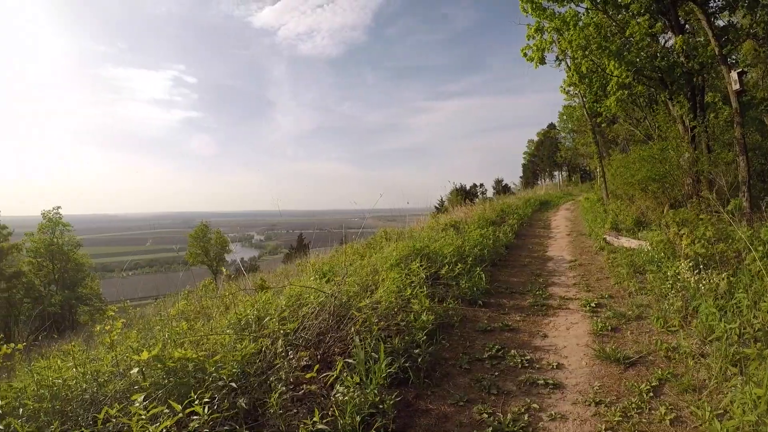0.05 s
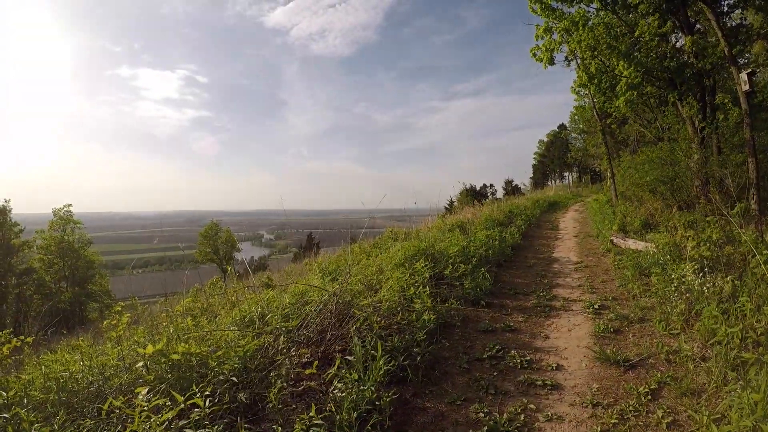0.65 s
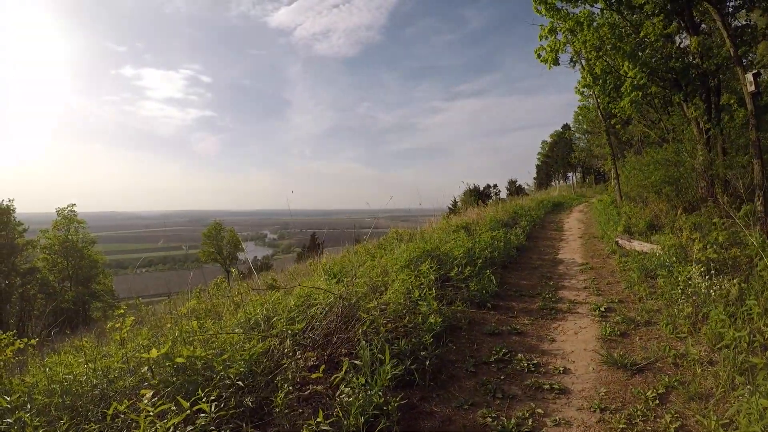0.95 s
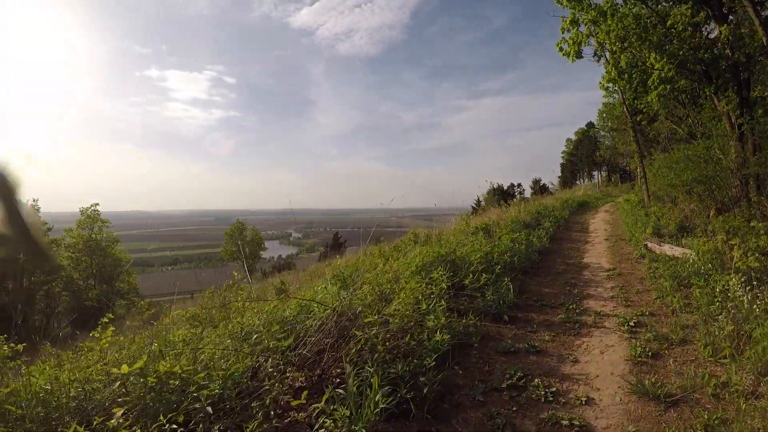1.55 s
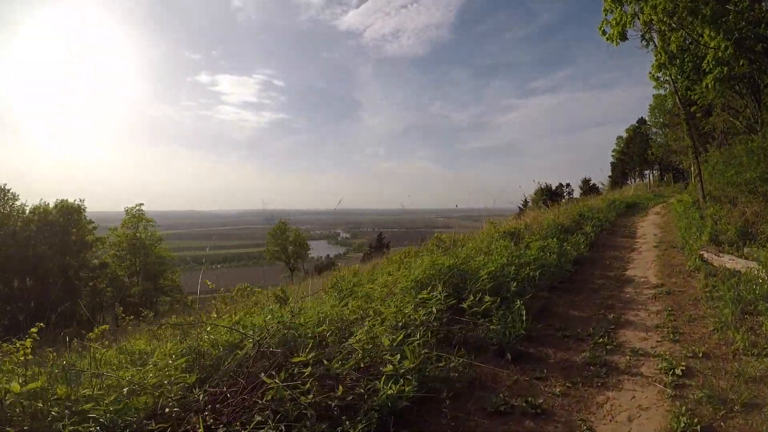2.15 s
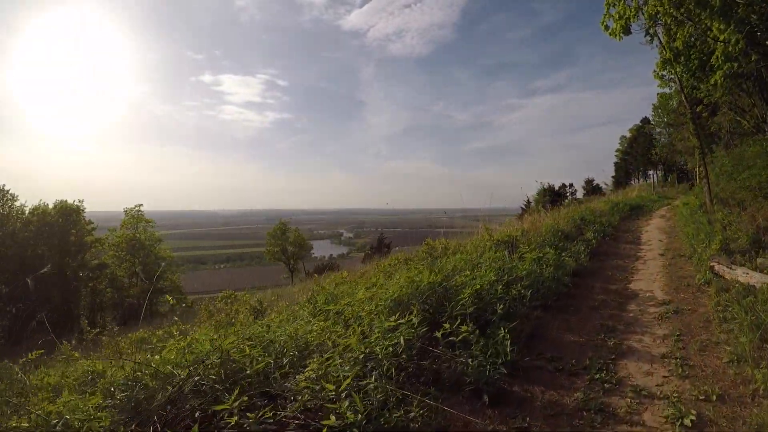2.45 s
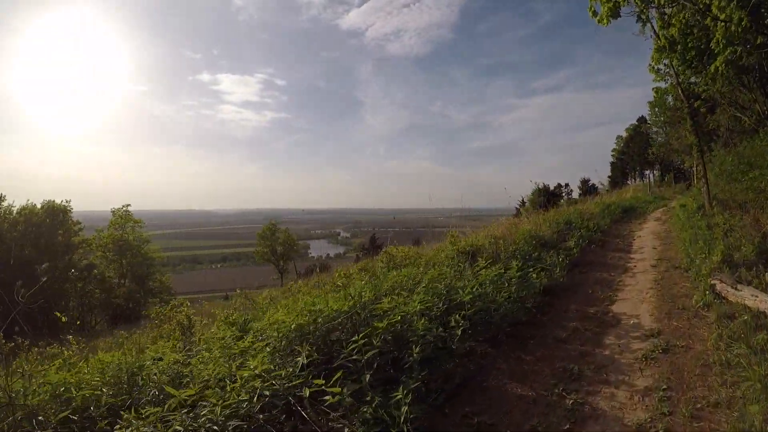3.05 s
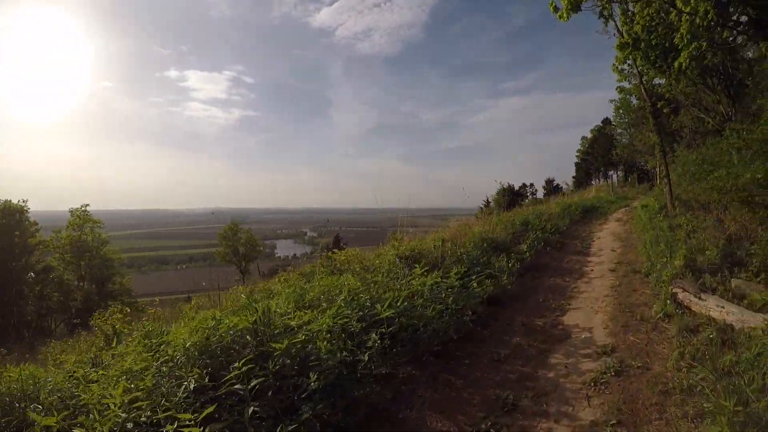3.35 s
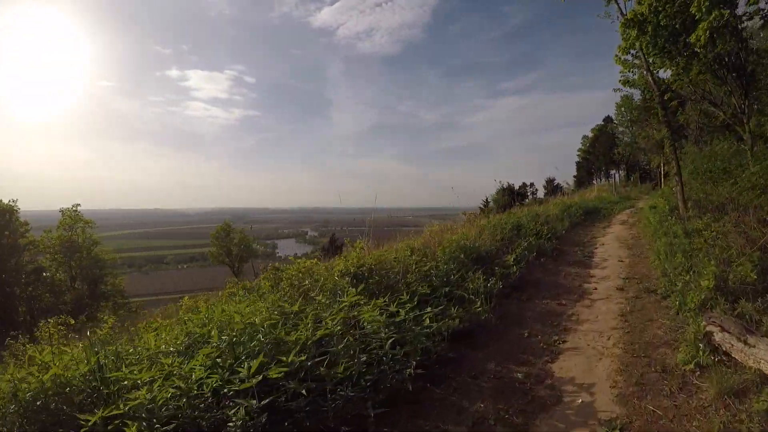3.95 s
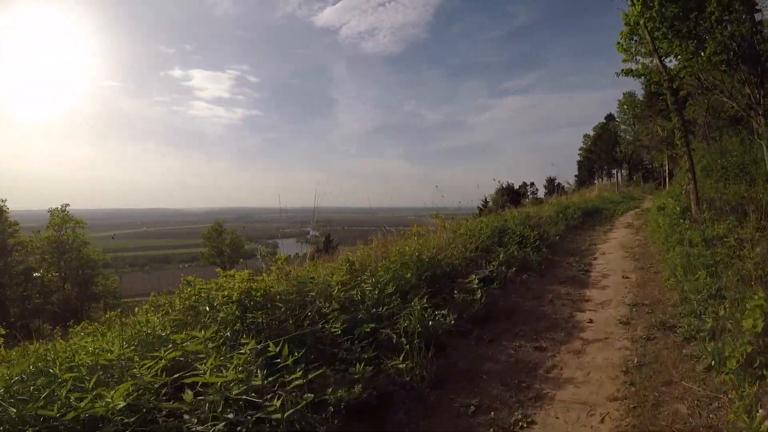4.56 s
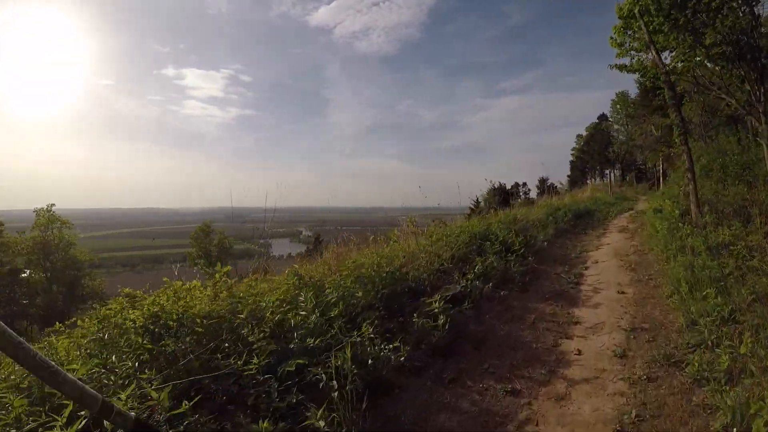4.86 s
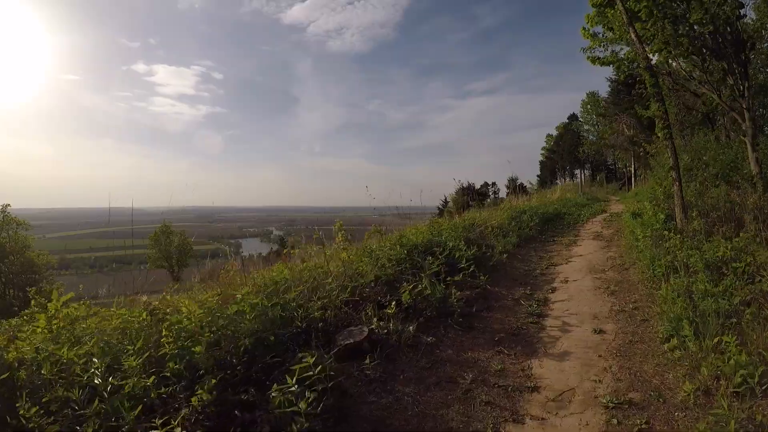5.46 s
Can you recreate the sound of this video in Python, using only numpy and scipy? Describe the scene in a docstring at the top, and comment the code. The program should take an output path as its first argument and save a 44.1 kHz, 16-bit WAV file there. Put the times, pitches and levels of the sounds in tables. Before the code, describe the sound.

Close, hollow handling knocks and plastic clacks over faint microphone wind give way to quiet steps on a dirt trail and rustling.

```python
"""Fingers knock and rub on a small hand-held camera as a walker on a dirt trail shifts the grip.
Impacts and stick-slip friction excite the damped modes of its housing and mount; a plastic joint clacks.
Then soft steps thud on packed earth, and clothing and tall grass swish close by through friction.
Light wind rumbles on the microphone ports as turbulent pressure, over a very quiet open landscape.
A limiter holds down the hardest knocks."""
import sys
import numpy as np
from scipy import signal
from scipy.fft import rfft, irfft, next_fast_len
from scipy.io import wavfile
from scipy.ndimage import uniform_filter1d, minimum_filter1d

SR = 44100
rng = np.random.default_rng(int(sys.argv[2]) if len(sys.argv) > 2 else 0)


def wav_record(signal):
    """Record a signal, one row per channel, as 16-bit PCM in the file named by sys.argv[1]."""
    frames = np.transpose(np.atleast_2d(signal))
    bounded = np.clip(frames, -1, 1)
    # unit amplitude maps onto the largest positive 16-bit level
    quanta = np.round(bounded * 32767).astype(np.int16)
    wavfile.write(sys.argv[1], SR, quanta)


N = 246519
T = np.arange(N) / SR

# Finger taps. Each row: start in seconds, peak in dB, contact cutoff in Hz, hand cavity note in Hz.
TAPS = [(.209, -26, 1310, 500), (.592, -26, 1020, 407), (0.687, -25, 390, 340), (.782, -27.5, 1050, 390),
        (0.919, -25, 1800, 453), (1.031, -25.5, 560, 400), (1.266, -29, 830, 286), (1.296, -30, 428, 300),
        (1.467, -35, 415, 440), (1.514, -26, 367, 351), (1.565, -19, 330, 557), (1.6, -27, 300, 400),
        (1.762, -29, 1180, 426), (2.018, -29, 1280, 251), (2.045, -37.5, 700, 252),
        (2.268, -31.5, 755, 380), (2.278, -24.5, 950, 373), (2.525, -25.5, 1400, 521)]
# Modes of the housing. Each row: frequency in Hz, relative level in dB, 60 dB decay time in seconds.
HOUSING_MODES = [(237, -14.5, 0.13), (314, -0.5, 0.032), (400, -9.5, 0.028), (517, -1, 0.019),
                 (1040, -2.5, 0.0051)]
# Bending modes of the mount, with the same columns.
MOUNT_MODES = [(140.6, -0.5, 0.45), (196.4, -4, 0.49), (281.3, 1, 0.15), (404.6, -5.5, 0.31)]


def amp(db):
    """Amplitude ratio of a level in decibels."""
    return 10 ** (np.asarray(db) / 20)


def unit(x):
    """Normalisation to an rms of 1."""
    return x / np.sqrt(np.mean(x ** 2))


def add(out, start, sound):
    """Superposition of a sound from a start in seconds."""
    i = max(int(start * SR), 0)
    out[:, i:i + sound.shape[-1]] += sound[..., :max(N - i, 0)]


def envelope(points):
    """Amplitude envelope through (seconds, dB) points, fading within 20 ms beyond the ends."""
    times, db = np.transpose(points)
    inside = np.clip(1 + np.minimum(T - times[0], times[-1] - T) / .02, 0, 1)
    return inside * amp(np.interp(T, times, db))


def press(t, length, rise_s, fall_s):
    """Contact pressure from t = 0: linear rise, hold, exponential release."""
    return np.clip(t / rise_s, 0, 1) * np.exp(-np.maximum(t - length, 0) / fall_s)


def colour(x, points, tilt_db=0):
    """Spectral shaping by (Hz, dB) points, with a tilt per octave about 1024 Hz."""
    size = next_fast_len(x.shape[-1])
    octave = np.log2(np.maximum(np.fft.rfftfreq(size, 1 / SR), 1))
    hz, db = np.transpose(points)
    gain = amp(np.interp(octave, np.log2(hz), db) + tilt_db * (octave - 10))
    return irfft(rfft(x, size) * gain, size)[..., :x.shape[-1]]


def soften(x, hz, order=2):
    """Low-pass filtering, as by a soft contact."""
    return signal.sosfilt(signal.butter(order, hz, fs=SR, output="sos"), x)


def drift(rate):
    """Random fluctuation of rms 1, gliding to a new value `rate` times a second."""
    hold = int(SR / rate)
    stairs = np.repeat(rng.standard_normal(N // hold + 1), hold)
    return unit(uniform_filter1d(stairs, hold)[:N])


def flicker(x, depth_db, rate):
    """Independent amplitude modulation of bands about half an octave wide."""
    size = next_fast_len(N)
    centres = np.geomspace(300, 14000, 12)
    place = np.interp(np.fft.rfftfreq(size, 1 / SR), centres, np.arange(len(centres)))
    spectrum = rfft(x, size)
    weights = (np.maximum(1 - np.abs(place - k), 0) for k in range(len(centres)))
    return sum(irfft(spectrum * w, size)[:, :N] * amp(depth_db * drift(rate)) for w in weights)


def grit(size, spread_db, apart):
    """Friction noise: dense micro-slips of unequal strength, partly different at the two ports."""
    strength = amp(spread_db * np.minimum(rng.exponential(size=size // 8 + 1), 6))
    mid, side = rng.standard_normal((2, size)) * np.repeat(strength, 8)[:size]
    return unit(np.array([mid + apart * side, mid - apart * side]))


def ring(modes):
    """Modal impulse response: a damped sinusoid for each (Hz, dB, 60 dB decay time in seconds)."""
    t = T[:SR // 2]
    return sum(amp(db) * np.sin(2 * np.pi * hz * t) * np.exp(-np.log(1000) * t / t60)
               for hz, db, t60 in modes)


def landscape(level_db=-65):
    """Far-off drone and leaf hiss form a diffuse field, coherent at the two ports in the bass."""
    # Each row: frequency in Hz, relative level in dB.
    spectrum = [(35, -72), (62, 4.5), (90, -7), (125, -4), (200, -5), (300, -11), (1500, -23.5),
                (4000, -32), (16000, -36.5)]
    mid, side = rng.standard_normal((2, N))
    side = 0.54 * (side - soften(side, 500, order=1))
    return amp(level_db + drift(2.07)) * unit(colour(np.array([mid + side, mid - side]), spectrum))


def wind(gain_db=1, left_db=2.4):
    """Turbulence: eddies buffet each port with its own low-frequency pressure."""
    # Each row: time in seconds, gust level in dB.
    gusts = [(0, -45.5), (.2, -47), (.33, -40.5), (.55, -47), (1.2, -44), (1.8, -46.5), (2.3, -56.5),
             (5.59, -71)]
    # Each row: frequency in Hz, relative level in dB.
    spectrum = [(10, 5), (45, -1.5), (62, -6), (90, -14.5), (150, -26.5), (500, -85)]
    eddies = unit(colour(rng.standard_normal((2, N)), spectrum))
    return envelope(gusts) * eddies * amp(gain_db + np.array([[left_db], [-left_db]]))


def port_directivity(x):
    """Directivity: each port faces its own way and favours different frequencies."""
    # Each row: frequency in Hz, left minus right in dB.
    balance = [(150, -1.5), (1290, -4.5), (4400, -1), (8120, 3), (13000, 0)]
    hz, db = np.transpose(balance)
    return np.array([colour(side, np.c_[hz, sign * db / 2]) for side, sign in zip(x, (1, -1))])


def reflections(x, echo_db=-9, decay_s=0.002, shifts_per_s=3, count=3):
    """Early echoes off body and ground interfere with the direct sound in a randomly shifting comb."""
    t = T[:SR // 10]
    responses = rng.standard_normal((count, len(t))) * np.exp(-t / decay_s)
    shares = np.array([drift(shifts_per_s) for _ in responses])
    shares /= np.linalg.norm(shares, axis=0)
    echoes = (signal.fftconvolve(x, r[None] / np.linalg.norm(r))[:, :N] for r in responses)
    return x + amp(echo_db) * sum(share * echo for share, echo in zip(shares, echoes))


def rustle(swish_db=-0.97, flap_db=-8, flap_db_per_s=-10):
    """Friction of fibres and grass blades follows the brushing force; the cloth flaps, fading as the camera
    moves away from the body."""
    # Each row: time in seconds, brushing strength in dB.
    brushing = [(4.04, -80), (4.136, -52), (4.24, -57.5), (4.25, -50.5), (4.325, -52), (4.354, -42.5),
                (4.397, -50.5), (4.44, -42), (4.548, -54.5), (4.595, -44.5), (4.712, -64), (4.84, -44.5),
                (4.898, -56.5), (5.002, -61.5), (5.104, -51.5), (5.128, -54.5), (5.185, -48.5),
                (5.216, -58), (5.335, -50), (5.55, -69)]
    # Spectra of the swish and the flapping. Each row: frequency in Hz, relative level in dB.
    swish_spectrum = [(400, -32), (900, -7), (1780, -3), (4000, -2), (11000, -5.5), (12000, -8),
                      (13000, -11.5), (15800, -17)]
    cloth_spectrum = [(50, 1.5), (120, -3), (500, 0), (900, -8.5), (2000, -71)]
    # Resonances of the ports. Each row: frequency in Hz, bandwidth in Hz, gain in dB.
    port_modes = [(4920, 330, -7), (7600, 370, -2.5)]
    force = envelope(brushing)
    flapping = force * amp(flap_db + flap_db_per_s * np.maximum(T - brushing[0][0], 0))
    fibres = colour(grit(N, spread_db=2.5, apart=0.33), swish_spectrum)
    fibres = flicker(fibres, depth_db=1.75, rate=60)
    fibres += sum(amp(db) * signal.lfilter(*signal.iirpeak(hz, hz / width, fs=SR), fibres)
                  for hz, width, db in port_modes)
    cloth = colour(grit(N, spread_db=1.5, apart=0.084), cloth_spectrum)
    return amp(swish_db) * force * unit(fibres) + flapping * unit(cloth)


def steps(sole_hz=480, heel_roll_s=0.0066, crunch_s=0.028, crunch_hz=2800):
    """Soft impacts excite damped modes of the soil; granular friction adds crunches and scuffs."""
    # Each row: start in seconds, thud peak in dB, crunch level in dB.
    footfalls = [(3.105, -46, -62), (3.403, -50, -57), (3.685, -47, -55.5), (3.927, -40.5, -60),
                 (5.089, -52.5, -54), (5.569, -54, -56)]
    # Each row: start in seconds, length in seconds, level in dB, cutoff in Hz. The first row, at 2.44 s, is a
    # dry scrape on the camera rather than a scuff underfoot.
    scuffs = [(2.438, 0.015, -58, 4930), (2.68, 0.012, -60.5, 12000), (2.721, 0.018, -61.5, 5000),
              (2.759, 0.035, -59, 12600), (2.87, 0.035, -62.5, 4930), (2.932, .11, -65.5, 3900),
              (3.082, 0.015, -61.5, 8900), (3.189, 0.12, -68.5, 6500), (3.592, 0.0053, -51, 4400),
              (3.833, 0.018, -53.5, 11100), (3.867, 0.068, -61.5, 12900)]
    # Each row: frequency in Hz, relative level in dB, 60 dB decay time in seconds.
    soil_modes = [(70, -1.6, 0.14), (125, -0.62, 0.079), (278, 1, 0.044), (453, -0.21, 0.04)]
    # Each row: frequency in Hz, relative level in dB.
    dirt_spectrum = [(150, 0), (700, 1.5), (2000, -6.5), (4000, -10.5), (9000, -8), (15500, -9)]
    out, t = np.zeros((2, N)), T[:SR // 2]

    def dirt(cutoff_hz):
        """Friction noise of loose grains."""
        grains = colour(grit(len(t), spread_db=2.0, apart=0.36), dirt_spectrum)
        return unit(soften(grains, cutoff_hz))

    rolling = 1 - np.exp(-t / heel_roll_s)
    for start, length, db, hz in scuffs:
        add(out, start, amp(db) * press(t, length, rise_s=0.0024, fall_s=0.019) * dirt(hz))
    for start, _, db in footfalls:
        add(out, start, amp(db) * rolling * np.exp(-t / crunch_s) * dirt(crunch_hz))
    out = flicker(out, depth_db=4, rate=130)  # grains of each size slip at their own moments
    thud = soften(ring(soil_modes) * rolling, sole_hz)
    for start, db, _ in footfalls:
        add(out, start, -amp(db) * thud / np.abs(thud).max())
    return out


def jingles(level_db=-68, ring_s=0.12, modes_hz=(2960, 3180, 3840)):
    """Free vibration of a small metal fitting: each jog shares its energy differently among the modes."""
    out = np.zeros((2, N))
    for start in (1.128, 1.398, 1.496, 1.62):
        add(out, start, ring([(hz, level_db + 2 * rng.standard_normal(), ring_s) for hz in modes_hz]))
    return out


def ticks(snap_s=0.0039, tail_s=0.059, tail_db=-22):
    """Fittings, grit and dry stalks snap in band-limited transients with faint scattered tails."""
    # Each row: start in seconds, peak in dB, centre frequency in Hz.
    snaps = [(0.825, -37, 2800), (0.915, -31, 3450), (2.036, -47, 4400), (1.965, -51.5, 8100),
             (2.101, -56, 10000), (2.2044, -30.5, 9100), (2.32, -44.5, 9000), (2.444, -38.5, 1390),
             (2.682, -44, 9900), (3.23, -67, 3570), (3.816, -41.5, 9700), (3.815, -45.5, 1830),
             (3.865, -40.5, 7840), (3.879, -40.5, 5130), (4.186, -44.5, 680), (5.478, -46, 5160)]
    out, t = np.zeros((2, N)), T[:SR // 10]
    decay = np.exp(-t / snap_s) + amp(tail_db) * np.exp(-t / tail_s)
    for start, db, hz in snaps:
        snap = grit(len(t), spread_db=3.5, apart=0.37) * decay
        band = signal.iirpeak(hz, Q=1.1, fs=SR)
        tick = signal.lfilter(*band, signal.lfilter(*band, snap))
        add(out, start, amp(db) * tick / np.abs(tick).max())
    return out


def scrapes(rise_s=0.00037, fall_s=0.0067):
    """Sliding friction of the fingers starts sharply, catches unevenly and trails off."""
    # Each row: start in seconds, length in seconds, level in dB, tilt in dB per octave.
    strokes = [(0.199, 0.02, -42.5, 0), (0.246, 0.02, -52.5, 2), (0.64, 0.027, -42, 2),
               (0.808, 0.016, -43.5, 1.5), (0.871, 0.033, -39, 2.5), (1.033, 0.0039, -39, 0.9),
               (2.002, 0.05, -55.5, 3.5), (2.523, 0.044, -50.5, 1.3)]
    # Each row: frequency in Hz, relative level in dB.
    spectrum = [(120, -13), (260, 7), (450, 5), (958, -5.5), (1630, -14), (3910, -20), (11500, -35.5),
                (15500, -49.5)]
    out, t = np.zeros((2, N)), T[:SR // 5]
    catching = amp(2.5 * drift(140))
    for start, length, db, tilt_db in strokes:
        friction = unit(colour(grit(len(t), spread_db=3.5, apart=0.26), spectrum, tilt_db))
        add(out, start, amp(db) * press(t, length, rise_s, fall_s) * friction)
    return out * catching


def hand_cavity(x, width_hz=65):
    """Cavity resonance of the air under the cupped hand, gliding from one hold to the next."""
    times, _, _, hz = np.transpose(TAPS)
    carrier = np.exp(2j * np.pi * np.cumsum(np.interp(T, times, hz)) / SR)
    # shifting down, low-passing and shifting back makes a moving band-pass
    return unit((soften(x / carrier, width_hz / 2, order=1) * carrier).real)


def grip(rub_db=-4, mount_db=-6, housing_db=-4, cavity_db=-7, hiss_db=1, rise_s=0.0092, fall_s=0.064):
    """Stick-slip friction of skin drives mount, housing and hand cavity: a dull rumble and some hiss."""
    # Each row: start in seconds, length in seconds, rubbing level in dB, skin hiss level in dB.
    slides = [(0.205, 0.041, -50, -58.5), (0.333, 0.019, -49.5, -63), (0.621, 0.22, -43, -57),
              (0.909, 0.11, -37, -58), (1.103, 0.064, -47.5, -59.5), (1.253, 0.05, -43, -63),
              (1.457, 0.066, -51.5, -62), (1.551, 0.028, -39.5, -80)]
    # Each row of both: frequency in Hz, relative level in dB.
    rub_spectrum = [(50, -36), (100, 3.5), (300, 3.5), (654, 0), (950, -10.5), (1430, -26.5), (3000, -32.5),
                    (5000, -79)]
    hiss_spectrum = [(590, -10), (1000, -10), (2100, -17), (4200, -22.5), (6000, -27.5), (15500, -40.5)]
    resting = press(T, 2.84, rise_s, fall_s)  # light contact until the hold is settled
    rubbing, hissing = amp(-65) * resting, amp(-68) * resting
    for start, length, db, skin_db in slides:
        pressure = press(T - start, length, rise_s, fall_s)
        rubbing = np.hypot(rubbing, amp(db) * pressure)
        hissing = np.hypot(hissing, amp(skin_db) * pressure)
    slips = colour(grit(N, spread_db=2.0, apart=0.37) * amp(drift(70)), rub_spectrum)
    force = slips.mean(axis=0)
    mount = amp(mount_db) * unit(signal.fftconvolve(force, ring(MOUNT_MODES))[:N])
    housing = amp(housing_db) * unit(signal.fftconvolve(force, ring(HOUSING_MODES))[:N])
    rub = unit(slips) + mount + housing + amp(cavity_db) * hand_cavity(force)
    hiss = colour(grit(N, spread_db=2.0, apart=0.56), hiss_spectrum)
    hiss = unit(hiss * amp(1.9 * drift(35.08)))
    return amp(rub_db) * rubbing * rub + amp(hiss_db) * hissing * hiss


def clacks(off_note_db_per_octave=-12, rattle=0.13, rattle_s=0.0045):
    """Impact excitation: the mount's plastic joint snaps home, rattles and rings near a favoured note."""
    # Each row: start in seconds, peak in dB, favoured note in Hz.
    impacts = [(0.916, -25.5, 1400), (2.019, -31.5, 1700), (2.525, -33, 1190)]
    # Each row: frequency in Hz, relative level in dB, 60 dB decay time in seconds.
    joint_modes = [(1233, -1, 0.055), (1486, 4, 0.023), (1600, -2.5, 0.059), (2180, -8, 0.019)]
    out, t = np.zeros((2, N)), T[:SR // 5]
    for start, db, note_hz in impacts:
        force = rattle * np.exp(-t / rattle_s) * grit(len(t), spread_db=8, apart=0.83)
        force[:, 0] += 1
        joint = ring([(hz, level + off_note_db_per_octave * abs(np.log2(hz / note_hz)), t60)
                      for hz, level, t60 in joint_modes])
        clack = signal.fftconvolve(force, joint[None])[:, :len(t)]
        add(out, start, amp(db) * clack / np.abs(clack).max())
    return out


def bumps(push_s=0.012):
    """Bending vibration: the palm leans into the mount, which booms on with a hollow note."""
    # Each row: start in seconds, peak in dB.
    pushes = [(1.299, -38), (1.561, -24)]
    out = np.zeros((2, N))
    boom = ring(MOUNT_MODES) * (1 - np.exp(-T[:SR // 2] / push_s))
    for start, db in pushes:
        add(out, start, amp(db) * boom / np.abs(boom).max())
    return out


def knocks(chatter=0.038, chatter_s=0.016, crack_s=0.003, cavity_db=-3, cavity_s=0.036):
    """Each tap is an impulse that rings housing and hand cavity; the loose joint chatters just after."""
    out, t = np.zeros((2, N)), T[:SR // 2]
    # the small stiff shell gives no deep bass
    shell = signal.sosfilt(signal.butter(2, 140, "high", fs=SR, output="sos"), ring(HOUSING_MODES))
    # the dense upper modes of the plastic die at once and differ with every spot touched
    crack_band = signal.butter(3, [900, 2700], "band", fs=SR, output="sos")
    for start, db, contact_hz, cavity_hz in TAPS:
        crack = unit(signal.sosfilt(crack_band, rng.standard_normal(len(t)))) * np.exp(-t / crack_s)
        force = chatter * np.exp(-t / chatter_s) * grit(len(t), spread_db=-7.0, apart=0.17)
        force[:, 0] += 1  # the tap itself
        body = shell + crack + ring([(cavity_hz, cavity_db, cavity_s)])
        knock = soften(signal.fftconvolve(force, body[None])[:, :len(t)], contact_hz)
        add(out, start, -amp(db) * knock / np.abs(knock).max())
    return out


def scene():
    """Superposition of handling, steps and rustle over wind and landscape."""
    handling = knocks() + bumps() + clacks() + grip() + scrapes() + ticks() + jingles()
    return handling + steps() + port_directivity(reflections(rustle())) + wind() + landscape()


def record(dry, ceiling_db=-24.5, release_s=0.033, top_hz=15900):
    """Peak limiting in the camera holds down the hardest knocks; a steep low-pass cuts the top."""
    excess = np.log(np.maximum(np.abs(dry).max(axis=0) / amp(ceiling_db), 1))
    reduction = np.maximum.accumulate(excess + T / release_s) - T / release_s
    gain = np.exp(uniform_filter1d(minimum_filter1d(-reduction, size=32), size=32))
    return signal.sosfilt(signal.ellip(10, .2, 70, top_hz, fs=SR, output="sos"), dry * gain)


dry = scene()
out = record(dry)
wav_record(out)
```